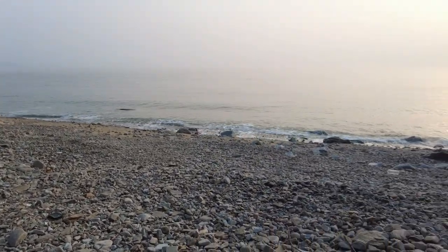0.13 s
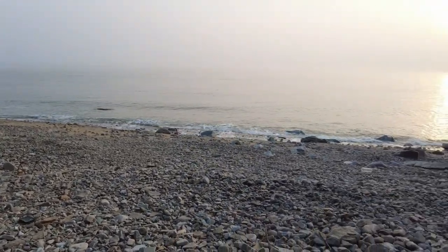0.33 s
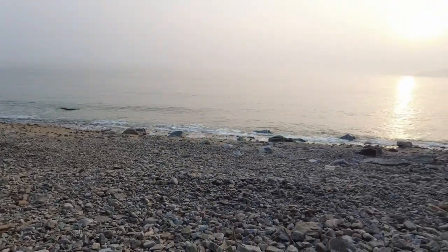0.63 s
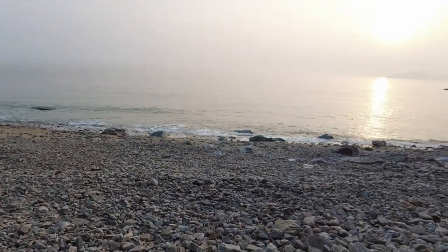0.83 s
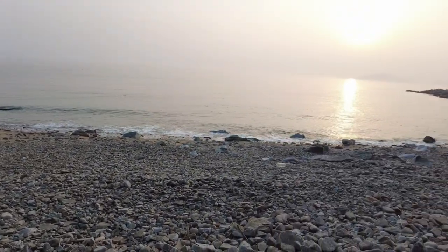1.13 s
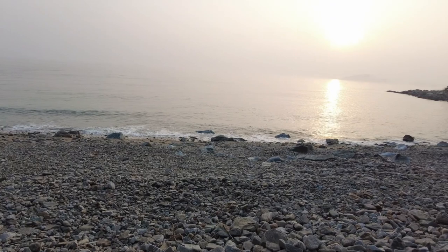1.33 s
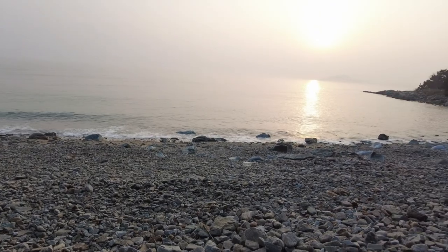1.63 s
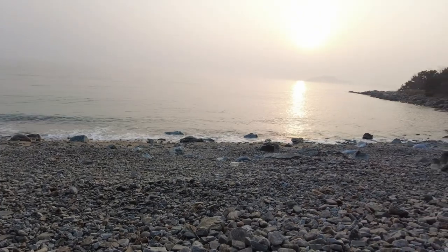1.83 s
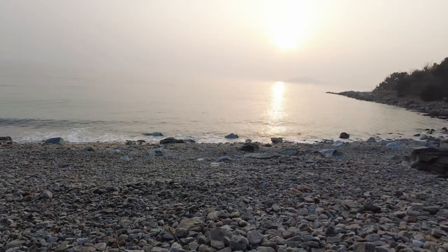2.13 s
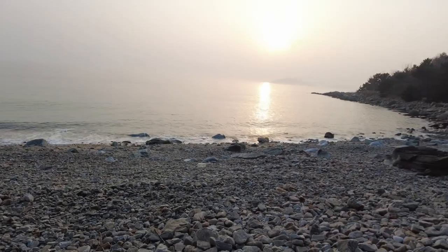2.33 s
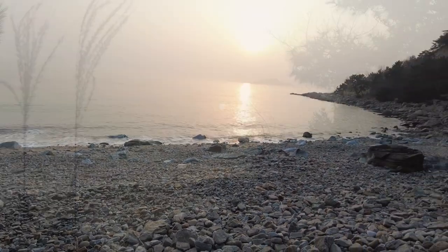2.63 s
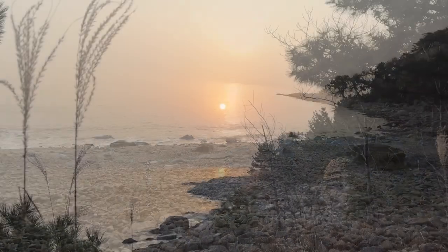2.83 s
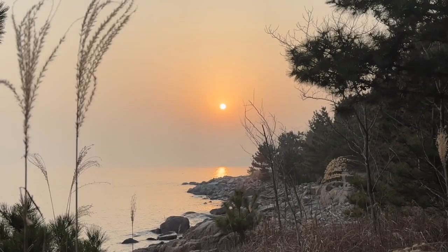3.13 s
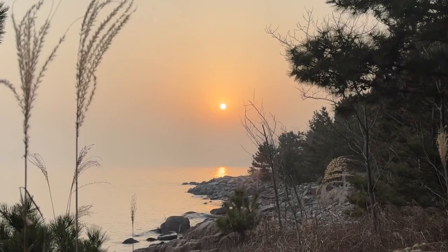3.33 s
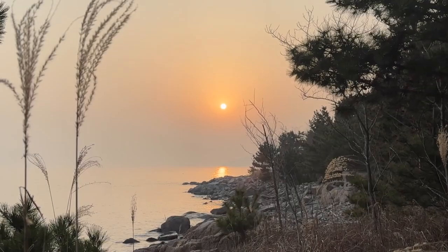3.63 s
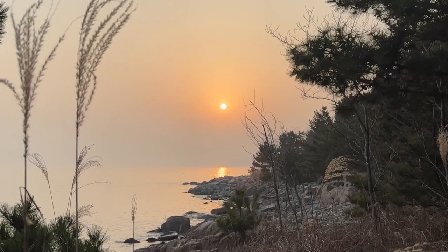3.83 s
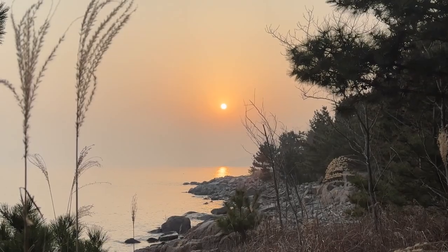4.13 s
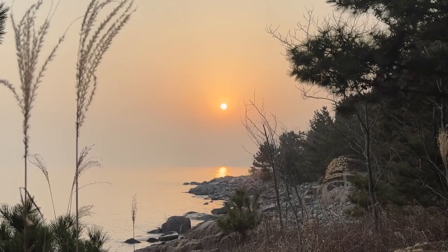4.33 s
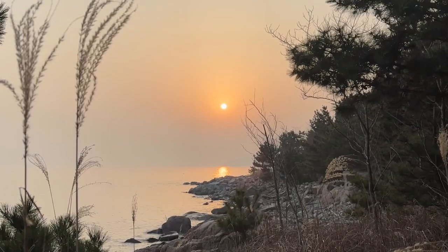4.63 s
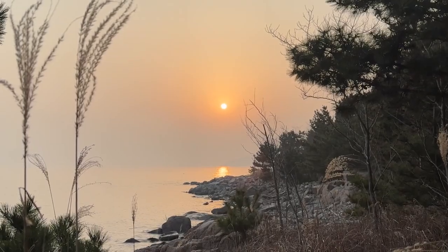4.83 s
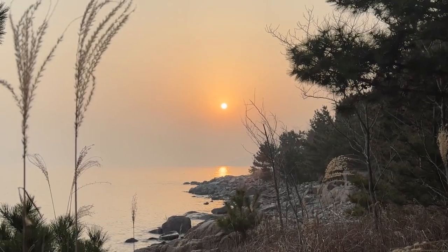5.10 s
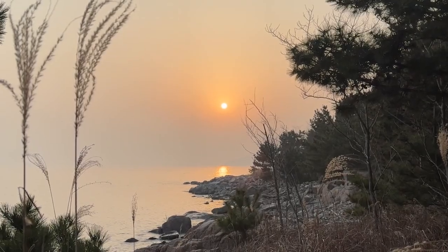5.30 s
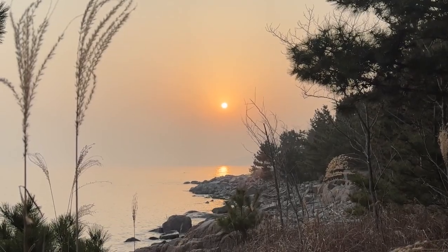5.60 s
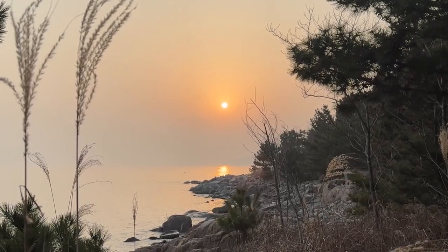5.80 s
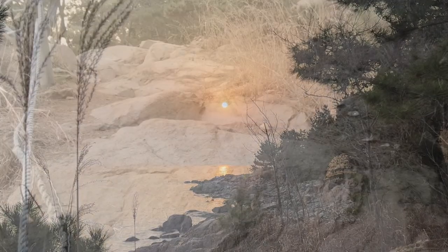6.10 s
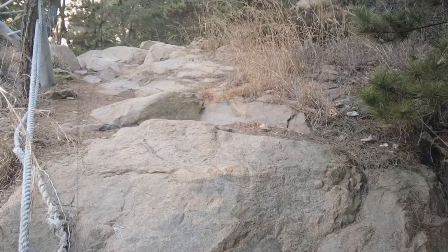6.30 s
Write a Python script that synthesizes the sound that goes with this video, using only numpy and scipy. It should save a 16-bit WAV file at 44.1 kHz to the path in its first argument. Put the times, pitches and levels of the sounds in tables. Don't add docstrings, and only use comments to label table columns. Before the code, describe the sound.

Stereo beach ambience from a handheld camera: soft receding surf with low wind buffeting, thinning to a muffled far wash. At about the middle it fades quickly into louder nearby waves that curl, crash slightly to the left and rake pebbles with bright foam hiss. Finally a duller, sheltered spot with strong wind thumps and one small, clear water drop.

```python
import sys
import numpy as np
from scipy import signal
from scipy.fft import rfft, irfft, next_fast_len
from scipy.io import wavfile
from scipy.ndimage import uniform_filter1d

SR = 44100
rng = np.random.default_rng(int(sys.argv[2]) if len(sys.argv) > 2 else 0)


def materialize(psi):
    bounded = np.clip(np.atleast_2d(psi).T, -1, 1)
    quanta = np.round(bounded * 32767).astype(np.int16)
    wavfile.write(sys.argv[1], SR, quanta)


def gain_from_db(level_db):
    decades = np.asarray(level_db, float) / 20
    return 10 ** decades


N = 284700
SIZE = next_fast_len(N)
HZ = np.maximum(np.arange(SIZE // 2 + 1) * SR / SIZE, 1)

# (frequency [Hz], level [dB per Hz], left minus right [dB],
# likeness [0-1], extra phase of right [rad])
EBB_WAVE = [(140, -67.0, -0.1, 0.97, -0.3), (350, -73.0, -0.2, 0.83, -0.3), (650, -71.5, 0.5, 0.8, 0.0),
            (950, -77.0, -1.0, 0.77, 0.2), (1150, -77.0, 0.2, 0.5, -0.1), (1350, -79.0, -1.4, 0.83, -3.1),
            (1800, -82.0, -0.6, 0.78, 3.0), (2300, -85.0, -1.1, 0.42, -3.0),
            (2800, -84.0, -1.8, 0.27, -2.5), (4000, -88.0, -2.1, 0.08, -1.3),
            (6000, -90.0, -2.2, 0.22, -1.7), (8300, -95.0, -2.9, 0.08, -0.2),
            (11400, -99.0, -1.5, 0.08, -0.4), (12000, -121.0, -1.8, 0.32, 2.9)]
FAR_WAVE = [(170, -82.0, 0.3, 0.96, -0.1), (350, -88.0, -0.2, 0.76, -0.1), (700, -85.0, 1.0, 0.18, -0.7),
            (950, -86.0, 0.6, 0.38, 3.0), (1150, -88.0, 1.2, 0.26, -3.0), (1350, -89.0, -0.1, 0.67, -0.7),
            (1800, -90.0, -0.4, 0.56, -0.8), (2300, -94.0, -0.1, 0.3, -1.7), (2800, -94.0, 0.5, 0.4, -2.8),
            (4000, -100.0, 0.5, 0.21, 3.1), (6000, -103.0, -0.0, 0.29, 2.5), (8300, -110.0, 0.1, 0.58, 0.0),
            (11400, -109.5, 1.1, 0.08, -0.4), (12000, -131.0, -0.1, 0.95, -3.1)]
CRASH_WAVE = [(128, -63, 2, .93, 0), (344, -63.5, 3, .82, -.3), (516, -62.5, 5, .72, -.8),
              (650, -62.5, 7, .62, -.5), (800, -62.5, 5.5, .75, 0), (1033, -65.5, 2, .82, 0),
              (1300, -68, 2.5, .6, -.1), (1550, -68.5, 3, .7, -.1), (1722, -68.5, 6, .55, -.15),
              (1981, -69.5, 4, .55, .45), (2239, -72.5, 0, .62, .8), (2583, -70.5, 2, .55, 0),
              (2928, -71.5, 2, .45, -.35), (3273, -72.5, 0, .55, .95), (3789, -75.5, -3, .55, .9),
              (4306, -78.5, -1, .3, 1.4), (4995, -79.5, 1, .4, 3.1), (5684, -79.5, 3, .3, 1.1),
              (6546, -80.5, 1, .1, 0), (7407, -79, 3, .6, -.9), (8268, -79, 4, .72, -1.2),
              (9130, -78, 0, .82, -.2), (9991, -82.5, 0, .6, .4), (10600, -96, 0, .9, .4)]
DRAG_WAVE = [(170, -68, 2.4, .94, -.2), (550, -63, 4.0, .93, -.6), (820, -64.5, 2.2, .92, .05),
             (1050, -67, .4, .91, 0), (1400, -67.5, 5.9, .8, .5), (1620, -70.5, 2.0, .82, 1.0),
             (1900, -70, 0, .84, .3), (2500, -72, -1.8, .85, .1), (3150, -73, -1.0, .78, .6),
             (3600, -76, -.5, .82, .1), (4300, -81.5, 0, .72, -.5), (4950, -80, .3, .76, 0),
             (5500, -84.5, -2.0, .32, -1.6), (7400, -86, 0, .3, -1.0), (8300, -84.5, -1, .62, -2.4),
             (9100, -83.5, 1, .8, -1.8), (9800, -86, .2, .78, -.9), (10500, -92, 0, 1, .1),
             (10850, -99, 0, 1, .1)]
LEE_WAVE = [(141, -67.5, -1.3, 0.8, 0.5), (352, -69, -0.1, 0.92, -0.9), (690, -70, -0.98, 0.65, 1),
            (980, -76, 0.49, 0.61, -2), (1190, -78, -0.6, 0.62, -2), (1330, -78.5, 0.11, 0.97, -0.2),
            (1810, -87.5, 0.4, 0.58, -1), (2280, -92, -0.3, 0.32, -8.5), (2750, -87.5, 0.9, 0.61, -1.5),
            (4000, -87, -0.1, 0.37, 1.5), (6060, -92, -0.2, 0.27, 4), (8300, -100.0, 0.7, 0.14, 3),
            (11700, -106.0, 0.2, 0.67, 0.5), (12100, -134.0, 0.2, 0.91, 2)]
# (lead of the right microphone [ms], top of the growing lead [Hz])
WAVE_LEADS = [
    (.4535, 1150),
    (0, 1000),
    (-.3175, 7000),
    (-.4308, 7000),
    (0, 1000),
]
WAVE_ORDER = [0, 1, 3, 2, 3, 4]
# (roar [dB], hiss [dB], fizz [dB])
WAVE_VOICES = [
    (1.5, -1.5, -6),
    (2.5, -9, -14),
    (2, -8, -17),
    (2, -7.5, -10),
    (-1, -9, -13),
    (2, -13.5, -17),
]
# (start [s], end [s])
WAVE_HANDOVERS = [
    (.45, 1.05),
    (2.62, 2.85),
    (2.75, 3.15),
    (4.2, 4.75),
    (5.85, 6.42),
]
# (time [s], level [dB], foam [dB])
WATER = [(0, -46, -5), (.6, -52.5, -5.5), (1.0, -59, 1), (1.3, -58.5, 1), (1.9, -62, 1), (2.68, -64, 1),
         (2.78, -58, 1), (2.9, -49.5, -1), (3.07, -44.5, 0), (3.4, -41.5, 0.5), (3.75, -41, 2),
         (4.25, -41.5, -1), (4.45, -46.5, 0.5), (4.95, -40.5, 0), (5.4, -39.5, 1.5), (5.65, -40.5, 0.5),
         (6.1, -46.5, 0), (6.46, -45, -1)]
RANGE_EDGES = [150, 900, 3500, 6500, 10500]
# (time [s], length [s], extra roar [dB], extra wash [dB])
TOPPLING_CRESTS = [
    (1.47, 0.24, -3, 7),
    (2.32, 0.067, 1, 3.5),
    (3.298, 0.35, -1, 0.9),
    (3.815, 0.25, 4.5, 1),
    (4.3, 0.12, 0, 1.1),
    (4.72, 0.25, 1, 1.5),
    (5.447, 0.078, 3.3, 1.5),
]
# (time [s], length [s], frequency [Hz], level [dB])
PEBBLE_SURGES = [(0.11, .12, 150, 5.5), (0.27, .08, 150, 8.5), (0.42, 0.47, 620, 4.5),
                 (1.08, 0.13, 2900, 4.5), (1.4, 0.057, 6600, 6), (1.515, 0.1, 380, 9), (2.5, 0.17, 3800, 4),
                 (2.86, 0.18, 6200, 8.5), (2.93, 0.49, 1400, 3.5), (3.12, 0.091, 5300, 6),
                 (3.25, 0.11, 150, 4), (6.4, 0.07, 910, 2), (3.4, 0.13, 160, 5.5), (3.95, 0.066, 730, 4.5),
                 (5.1, .1, 550, -2.5), (4.7, 0.4, 920, 2.5), (5.3, 0.17, 440, 6), (4, 0.047, 2300, 2),
                 (6, 0.28, 2600, 1.5), (6.05, .15, 150, 0), (1.31, .06, 4400, -7), (1.46, .04, 5800, 0),
                 (1.52, .05, 6800, 0), (5.3, .2, 150, 6), (3.17, 0.21, 132, 3), (3.7, .25, 135, 5.5),
                 (4.18, .3, 120, 3), (3.34, 0.27, 196, -5), (4.63, .2, 2200, -3), (5.4, 0.37, 2700, 1.5),
                 (9, 0.14, 3500, -0.5), (.25, 0.29, 690, -0.5), (3.93, 0.25, 590, -3), (6.9, 0.27, 270, -2),
                 (3.66, 0.27, 195, -6), (3.05, .2, 1500, 0), (6.05, 0.084, 390, -4.5), (1.55, .1, 140, 7),
                 (1.32, .1, 1300, -4), (6.15, .1, 170, 3), (7, .07, 5300, -8), (2.75, 0.096, 500, -2),
                 (2.9, 0.081, 300, -1.5), (0.86, 0.41, 170, -8)]
SURGE_HALF_WIDTH = 0.38
# (frequency [Hz], level [dB per Hz])
SPRAY_COLOUR = [(10600, -20), (11000, -4), (11700, -9.5), (12300, -8), (13500, -14), (14700, -13),
                (15300, -17), (15750, -12), (16200, -17)]
# (time [s], frequency [Hz], peak [dB], rise [s], t60 [s])
LONE_DROPS = [(1.41, 5500, -53, .004, 0.037), (1.41, 4700, -59, .004, .03), (1.412, 8300, -52, .003, 0.024),
              (1.45, 5900, -60, .004, .03), (1.43, 7500, -58, .003, .02), (1.47, 8600, -61, .003, .02),
              (1.5, 6350, -60, .003, .025), (1.54, 7900, -62, .003, .02), (1.485, 4600, -62, .004, .04),
              (1.565, 4670, -58, .004, 0.033), (6.44, 5490, -45, 0.0058, 0.18),
              (6.441, 13100, -61, .008, .2)]
# (frequency [Hz], level [dB per Hz])
OPEN_WIND = [(8.8, -35), (15, -6), (32, -15), (54, -9.5), (70, 2), (86, 1.5), (99, -10.5), (114, -18),
             (128, -15), (165, -24.5), (190, -44), (250, -60), (420, -120)]
COVE_WIND = [(8.8, -65), (15, -35), (21, -34), (24, -30), (35, -26), (49, -6), (81, 0.5), (96, -11),
             (108, -10.5), (150, -19), (260, -120)]
LEE_WIND = [(8.8, -32), (15, 1), (38, 10), (65, -10), (92, -5.5), (109, -5), (130, -20), (170, -43),
            (290, -120)]
# (start [s], end [s])
SPOT_HANDOVERS = [
    (2.65, 2.95),
    (5.95, 6.1),
]
WIND_BALANCE = [0, 2.5, -2.4]
# (open [dB], cove [dB], lee [dB])
WIND_SPREAD = [(-14, -19, -15), (-19.5, -16.5, -19)]
# (frequency [Hz], half width [Hz], level [dB])
HOUSING_BOOM = [
    (90, 3.5, 4),
    (70, 10, -3.5),
    (60, 3.4, 2),
]
# (thump [dB], rumble [dB])
WIND_LULLS = [
    (-50.5, -50.5),
    (-59, -43),
    (-36, -42.5),
]
# (time [s], peak [dB], length [s])
WIND_THUMPS = [(0.23, -49, 0.067), (0.58, -44.5, 0.1), (0.9, -47, 0.064), (1.04, -42.5, 0.043),
               (1.34, -46, 0.072), (1.6, -50, 0.089), (1.95, -52, 0.14), (2.29, -49, 0.11),
               (2.5, -46, 0.07), (2.74, -50, 0.056), (3.14, -46, 0.09), (3.33, -49, 0.2), (3.64, -46, 0.08),
               (4.12, -52, 0.08), (4.74, -44, 0.15), (5.32, -50, 0.1), (5.61, -51, 0.11),
               (5.73, -48, 0.093), (6.12, -29.5, 0.054), (6.39, -42, 0.098)]
WIND_PUFFS = [(0.19, -44.5, 0.06), (0.41, -43.5, 0.096), (0.56, -44.5, 0.088), (0.9, -46, 0.058),
              (1.05, -44.5, 0.045), (1.16, -47, 0.08), (1.4, -46.5, 0.034), (1.62, -45.5, 0.046),
              (1.76, -55, 0.058), (1.94, -55, 0.048), (2.14, -44.5, 0.075), (2.39, -64, 0.092),
              (2.56, -53, 0.054), (2.78, -49, .06), (1.52, -52, .05), (.08, -47, 0.046), (2.92, -61, 0.084),
              (3.14, -38, 0.075), (3.55, -42, 0.24), (3.85, -46, 0.041), (4.05, -40.5, 0.056),
              (4.23, -41, 0.04), (4.32, -40, 0.11), (4.5, -41, 0.087), (4.63, -44, 0.043),
              (4.78, -34.5, 0.044), (5.02, -37, 0.073), (5.35, -36.5, 0.091), (5.69, -51, 0.07),
              (5.96, -37, 0.039), (6.18, -37.5, 0.11), (6.39, -30.5, 0.037)]
# (time [s], readiness [0-1])
DROP_IN_TIME = [(0, .8), (.55, .8), (.8, .92), (1.3, 1), (2.0, 1), (2.6, .85), (2.9, .45), (6.18, .45),
                (6.36, .85), (6.4, .85), (6.43, .4)]
# (frequency [Hz], readiness [-])
DROP_IN_HZ = [(60, .35), (350, .55), (800, .9), (2200, .9), (3300, .95), (6000, .95), (7235, 1.25),
              (7925, 1.0), (8613, 1.2), (9300, 1.0), (9990, 1.24), (10680, .95), (11500, 1.05),
              (12100, 1.9), (13800, 1.5), (15000, 1.5)]
# (frequency [Hz], share of the band's mean power [-])
CELL_THINNING = [(1000, 0), (3000, .6), (9000, .9), (10500, 1.2), (11800, 2.8), (13000, 2.0), (15000, 1.3)]
# (time [s], luck [spreads])
AIR_GAPS = [(2.7, -3), (2.8, .3), (3.0, .3), (3.05, 1.8), (3.55, 1.8), (3.65, -.5), (4.8, -1.0),
            (5.0, -1.8), (6.0, -1.8), (6.05, -3)]
# (low [Hz], high [Hz], start [s], end [s])
MONO_TOP = (10350, 13700, 2.8, 6.05)


def surf(share, patchy_db, together_db):
    common, apart = froth(11000, spread_db=2.5), froth(11000, spread_db=2.5)
    tables = (EBB_WAVE, FAR_WAVE, CRASH_WAVE, DRAG_WAVE, LEE_WAVE)
    waves = [wave(table, lead, common, apart) for table, lead in zip(tables, WAVE_LEADS)]
    waves = [waves[k] for k in WAVE_ORDER]
    mixed = sum(s * pair * gain_from_db(-own[1]) for s, (pair, own) in zip(share, waves))
    own_power = sum(s ** 2 * gain_from_db(2 * (own - own[1]))[:, None] for s, (_, own) in zip(share, waves))
    wanted_db = surf_ranges(share) - 10 * np.log10(own_power)
    spectrum = rfft(mixed, SIZE)
    centres = np.geomspace(150, 10500, num=12)
    swells = [(bell(row[0], row[1]), row[2:]) for row in PEBBLE_SURGES]
    flicker, near = drift(21.0), drift(13.0)
    out = 0
    for k, hz in enumerate(centres):
        place = np.interp(np.log(hz), np.log([500, 1800, 4800, 8500]), [0, 1, 2, 3])
        low = min(int(place), 2)
        curve_db = wanted_db[low] + (place - low) * (wanted_db[low + 1] - wanted_db[low])
        near = 0.5 * near + 0.62 * drift(13.0)
        bright = k / len(centres)
        surges_db = sum(db * np.exp(-(np.log2(hz / at_hz) / SURGE_HALF_WIDTH) ** 2) * swell
                        for swell, (at_hz, db) in swells)
        gain = gain_from_db(curve_db + surges_db + patchy_db * near + together_db * bright * flicker)
        band = on_log_hz(centres, np.arange(len(centres)) == k)
        out = out + gain * irfft(spectrum * band, SIZE)[:, :N]
    return out


def surf_ranges(share):
    level_db, foam_db = in_time(WATER)
    roar, hiss, fizz = np.transpose(WAVE_VOICES) @ share ** 2
    crest_roar, crest_wash = sum(np.outer([r, w], bell(s, length)) for s, length, r, w in TOPPLING_CRESTS)
    fizz = fizz + 1.36 * foam_db + 0.57 * crest_wash
    return level_db + np.array([roar + crest_roar, crest_wash, hiss + foam_db, fizz])


def wave(table, lead, common, apart):
    hz, level_db, left_db, alike, phase = np.transpose(table)
    likeness = np.clip(alike, 0, 1) * np.exp(1j * phase)
    likeness = on_log_hz(hz, likeness.real) + 1j * on_log_hz(hz, likeness.imag)
    lead_ms, top_hz = lead
    late = np.exp(2j * np.pi * np.minimum(HZ, top_hz) * lead_ms / 1000)
    skirts = -22 * np.maximum(np.log2(hz[0] / HZ), 0) - 200 * np.maximum(np.log2(HZ / hz[-1]), 0)
    colour = gain_from_db(on_log_hz(hz, level_db) + skirts)
    tilt = gain_from_db(on_log_hz(hz, left_db) / 2)
    right = likeness * late * common + np.sqrt(np.maximum(1 - abs(likeness) ** 2, 0)) * apart
    pair = colour / np.sqrt(tilt ** 2 + tilt ** -2) * np.array([common * tilt, right / tilt])
    power = abs(pair.mean(0)) ** 2 * 2 / SIZE ** 2
    ranges = [power[(HZ > low) & (HZ < high)].sum() for low, high in zip(RANGE_EDGES, RANGE_EDGES[1:])]
    return irfft(pair, SIZE)[:, :N], 10 * np.log10(ranges)


def froth(per_s, spread_db):
    sizes = gain_from_db(spread_db * np.minimum(rng.exponential(1, SIZE), 3.5)) * rng.choice([-1, 1], SIZE)
    return rfft(sizes * (rng.random(SIZE) < per_s / SR))


def spray():
    fizz = rfft(rng.standard_normal((2, SIZE))) * gain_from_db(on_log_hz(*np.transpose(SPRAY_COLOUR)))
    mid, side = irfft(fizz * [HZ > 0, HZ > 13800], SIZE)[:, :N]
    in_cove = np.sqrt(shares([(2.67, 2.75), (5.9, 6.32)])[1])
    level_db, foam_db = in_time(WATER)
    before_crash = shares([(3.42, 3.44)])[0]
    spray_db = -61 + 0.74 * (level_db + 42.5) + 0.86 * foam_db - 3.8 * before_crash
    gain = in_cove * gain_from_db(spray_db + 0.94 * drift(19.0)) / mid.std()
    return gain * np.array([mid + side, mid - side])


def drops():
    out = np.zeros((2, N))
    balance = gain_from_db(np.array([[1], [-1]]))
    for s, hz, peak_db, rise, t60 in LONE_DROPS:
        start = int(s * SR)
        t = np.arange(min(N - start, 4000)) / SR
        ring = np.minimum(t / rise, 1) * gain_from_db(peak_db - 60 * t / t60) * np.sin(2 * np.pi * hz * t)
        out[:, start:start + len(t)] += ring * balance
    return out


def wind():
    spots = shares(SPOT_HANDOVERS)
    swings = rfft(rng.standard_normal((2, SIZE)))
    swings = swings * gain_from_db(sum(db * np.exp(-((HZ - hz) / width) ** 2) for hz, width, db in HOUSING_BOOM))
    upper = on_log_hz([45, 55], [0, 1])
    out = 0
    for part, level_db, seconds, apart_db in zip((1 - upper, upper), gusts(spots), (0.09, 0.06), WIND_SPREAD):
        mid, side = sum(np.sqrt(s) * irfft(swings * part * gain_from_db(on_log_hz(*np.transpose(colour))), SIZE)[:, :N]
                        for s, colour in zip(spots, (OPEN_WIND, COVE_WIND, LEE_WIND)))
        mid = evened(mid, seconds)
        side = evened(side, seconds) * gain_from_db(np.dot(apart_db, spots))
        out = out + gain_from_db(level_db) * np.array([mid + side, mid - side])
    left_db = np.dot(WIND_BALANCE, spots) / 2
    return out * gain_from_db(np.array([left_db, -left_db]))


def gusts(spots):
    lulls = np.transpose(WIND_LULLS) @ spots + 1.5 * np.array([drift(2.9), drift(5.9)])
    peaks = [sum(gain_from_db(2 * db) * bell(s, length) for s, db, length in rows) for rows in (WIND_THUMPS, WIND_PUFFS)]
    return 10 * np.log10(gain_from_db(2 * lulls) + peaks)


def in_time(rows):
    s, *columns = np.transpose(rows)
    return np.array([np.interp(np.arange(N) / SR, s, c) for c in columns])


def on_log_hz(hz, values):
    return np.interp(np.log(HZ), np.log(hz), values)


def bell(s, length):
    return np.exp(-4 * np.log(2) * ((np.arange(N) / SR - s) / max(length, 0.02)) ** 2)


def drift(rate):
    r = np.exp(-80 * np.pi * rate / SR)
    slow = signal.lfilter([1], [1, -2 * r, r * r], rng.standard_normal(N // 40 + 2002))[2000:]
    return np.interp(np.arange(N) / 40, np.arange(len(slow)), slow / slow.std())


def shares(handovers):
    t = np.arange(N) / SR
    ramps = [np.clip((t - start) / (end - start), 0, 1) for start, end in handovers]
    passed = [r ** 2 / (r ** 2 + (1 - r) ** 2) for r in ramps]
    return np.maximum(-np.diff([t * 0 + 1] + passed + [t * 0], axis=0), 0)


def evened(x, seconds):
    size = int(seconds * SR)
    return x / np.sqrt(uniform_filter1d(uniform_filter1d(x ** 2, size), size) + 1e-20)


def scene():
    waves = surf(np.sqrt(shares(WAVE_HANDOVERS)), patchy_db=1.16, together_db=0.5)
    return waves + spray() + drops() + wind()


def thrifty_camera(x, reach_db, luck_db):
    hz, s, cells = signal.stft([x[0] + x[1], x[0] - x[1]], SR, nperseg=2048)
    low_bands = np.round(7 * np.log2(1 + hz / 350))
    high_bands = np.interp(hz, [3400, 6890, 22739], [25, 32, 55])
    band = np.where(hz < 3400, low_bands, high_bands).astype(int)
    power = np.array([uniform_filter1d((abs(cells[:, band == b]) ** 2).sum(1), size=3)
                      for b in range(band.max() + 1)])
    margin_db = 10 * np.log10((power + 1e-20) / (power.sum(1, keepdims=True) + 1e-20))
    luck = uniform_filter1d(rng.standard_normal(power.shape), size=3) * np.sqrt(3)
    centre = [hz[band == b].mean() for b in range(len(power))]
    ready = np.interp(s, *np.transpose(DROP_IN_TIME))
    thrift = np.outer(np.interp(centre, *np.transpose(DROP_IN_HZ)), ready)
    kept = np.clip(margin_db + luck_db * luck + reach_db * (1 - thrift[:, None]) + 7, 0, 1)
    dice = luck[band, 0]
    gap = np.interp(s, *np.transpose(AIR_GAPS))
    air = ((hz > 11025) & (hz < 11710))[:, None]
    cells[0] *= 1 - air * (luck[band[520], 0] + 0.4 * dice < gap)
    wide_air = ((hz > 10340) & (hz < 12400))[:, None]
    cells[0] *= 1 - wide_air * (dice < gap - 2)
    cells *= 1 - (hz > 15050)[:, None] * (luck[band[705], 0] + (15650 - hz[:, None]) / 450 < 0)
    low, high, start, end = MONO_TOP
    cells[1] *= 1 - np.outer((hz > low) & (hz < high), (s > start) & (s < end))
    mean = (power[band] / np.bincount(band)[band, None, None]).transpose(1, 0, 2)
    strong = abs(cells) ** 2 > mean * np.outer(np.interp(hz, *np.transpose(CELL_THINNING)), ready)
    stored = cells * strong * kept[band].transpose(1, 0, 2)
    both, apart = signal.istft(stored, SR, nperseg=2048)[1][:, :N]
    return np.array([both + apart, both - apart]) / 2


def roll_off(x):
    return signal.sosfilt(signal.butter(12, 15720, fs=SR, output="sos"), x)


def record(dry):
    stored = thrifty_camera(dry, reach_db=16, luck_db=3.5)
    return roll_off(stored)


dry = scene()
out = record(dry)
materialize(out)
```